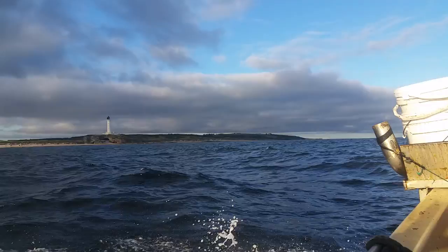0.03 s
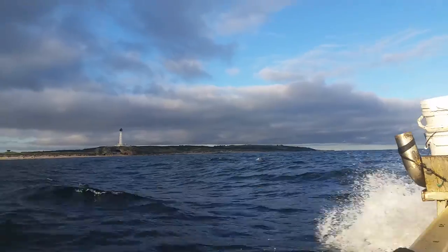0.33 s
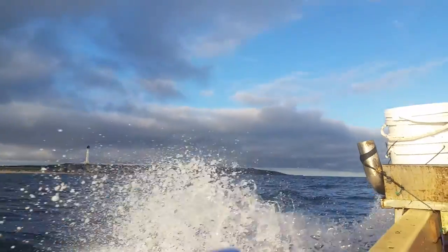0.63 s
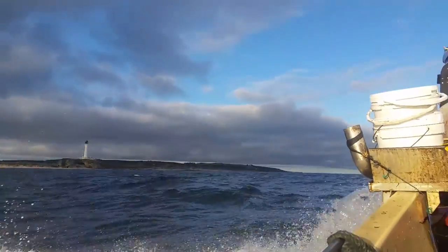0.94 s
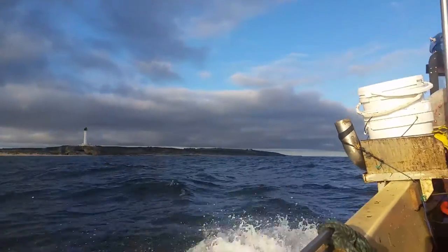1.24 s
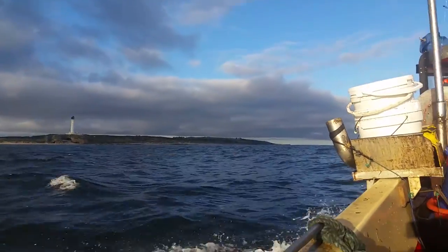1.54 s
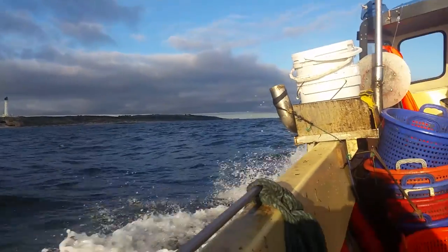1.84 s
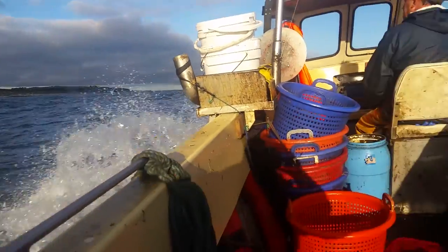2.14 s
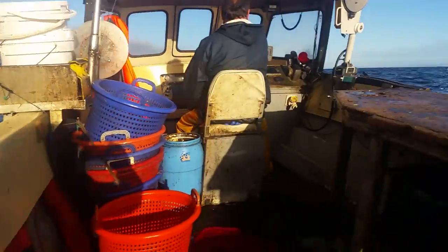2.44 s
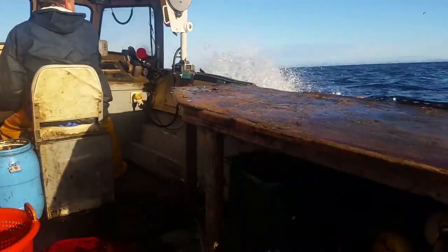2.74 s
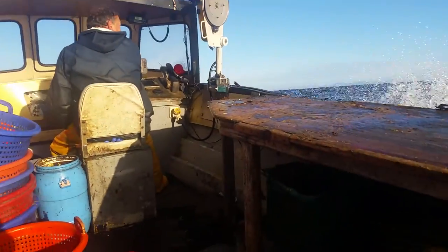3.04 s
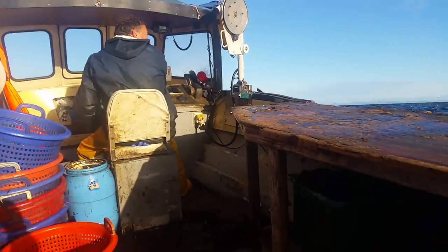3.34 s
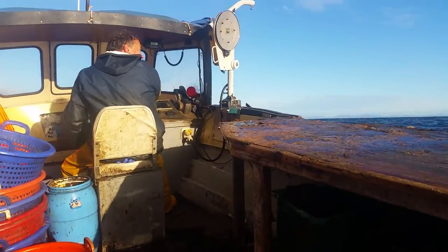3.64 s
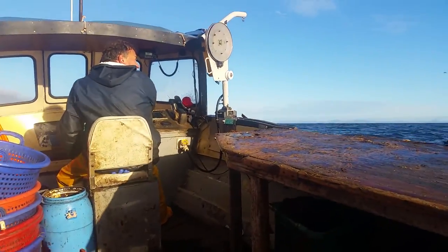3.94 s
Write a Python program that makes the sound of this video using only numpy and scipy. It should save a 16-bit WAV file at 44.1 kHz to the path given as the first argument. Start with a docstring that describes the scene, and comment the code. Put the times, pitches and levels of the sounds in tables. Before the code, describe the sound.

The diesel engine of a small boat fades in and holds a steady drone at sea. Spray splashes over the hull wash, wind buffets the microphone on deck with some hollow knocks, and the engine's clatter grows clearer past halfway.

```python
"""Open deck of a small fishing boat at steady speed. Fade-in on a four-cylinder diesel, its exhaust
droning at the firing rate. From 0.5 s bow spray hisses up and patters back over the hull wash.
From 1.3 s wind thumps repeatedly on the microphone ports, mostly the left, with a few hollow knocks.
Around 2.4 s a turn to the wheelhouse brings out the clatter of the block and a brief thin ring.
Spray and buffets continue to the end."""
import sys
import numpy as np
from scipy.fft import rfft, irfft, next_fast_len
from scipy.io import wavfile
from scipy.ndimage import uniform_filter1d, minimum_filter1d, map_coordinates

SR = 44100
rng = np.random.default_rng(int(sys.argv[2]) if len(sys.argv) > 2 else 0)


def master_out(mix):
    """Clip the mix to full scale and print it as 16-bit PCM to the path in sys.argv[1]."""
    frames = np.transpose(np.atleast_2d(mix))
    ceiling = np.clip(frames, -1, 1)
    pcm = np.round(ceiling * 32767).astype(np.int16)
    wavfile.write(sys.argv[1], SR, pcm)


N = 176400

# engine speed (time [s], firing rate [Hz])
FIRING_RATE = [(0.7, 147.0), (1.05, 146.7), (1.4, 147.2), (1.8, 147.1), (2.2, 147.1), (2.6, 147.7),
               (3.0, 147.2), (3.4, 147.6), (3.7, 147.7)]
# firing note as the deck rolls (time [s], left gain [dB], right gain [dB])
EXHAUST_ROLL = [(.4, 0.5, -1), (.7, -1.5, -3), (1.25, -1, -2.5), (1.48, -1.5, -5.5), (1.62, -0.5, -2),
                (1.9, -1.5, -3.5), (2.15, -3.5, -5.5), (2.35, -2, -2.5), (2.7, -1.5, 0.5), (2.95, -1, 0.5),
                (3.15, 0.5, 2), (3.5, 0, 0), (3.75, -1, 0.5), (4, 0, 1)]
# octave of the firing note (time [s], gain [dB])
OCTAVE_GAIN = [(.4, 9.5), (1.2, 8.5), (2.35, 8), (2.7, 0), (3.3, -2.5), (4, -11)]
# engine lines (order [x cycle rate], left [dB], right [dB], gain before the turn [dB])
ENGINE_LINES = [(5, -39, -44, 0), (6, -33, -34, -9), (7, -28, -31, -4), (9, -41, -40, -1),
                (10, -41, -44, -2), (12, -35, -40, 1), (13, -47, -47, -7), (16, -35, -37, -3),
                (18, -48, -51, -1), (19, -44, -49, -1), (20, -47, -43, -1), (23, -44, -43, -5),
                (24, -45, -49, -3), (25, -53, -44, -13), (28, -45, -52, -2), (42, -50, -51, -13),
                (43, -52, -51, -7), (48, -54, -46, -7), (56, -57, -47, -7)]
# level of the engine drone lines by frequency (frequency [Hz], gain [dB])
DRONE_COLOUR = [(200, 2), (330, 1.5), (450, -1), (700, -2.5), (900, -1), (1250, 2), (1550, 2.5), (2100, 2)]
# line two octaves over the firing note (time [s], gain [dB])
WHINE_GAIN = [(.4, 2.5), (1.65, 4), (2.2, -7), (2.7, 2.5), (2.95, 3.5), (3.55, 3.5), (4, -3)]
# block rasp (frequency [Hz], level per line [dB])
RASP_SPECTRUM = [(950, -56.5), (1250, -54), (1450, -60), (1900, -54.5), (2300, -61), (2700, -63),
                 (3000, -74)]
# block clatter (frequency [Hz], left [dB], right [dB])
CLATTER_SPECTRUM = [(200, -15, -7), (600, 3.5, -4.5), (1150, -6, 3), (1360, 12, 9), (1377, -11, -30),
                    (1840, -13, 3), (2450, -15, -7), (3100, -7.5, -7), (4020, -15, -6.5), (7000, -23, -23),
                    (16100, -27, -47)]
# clatter share, one per cylinder (gain [dB])
CYLINDER_DB = [3, 1, 1.8, 3.2]
# bow spray (time [s], left [dB], right [dB])
SPRAY_LEVEL = [(.42, -42, -42), (.515, -43, -45), (.53, -34, -40), (.57, -38.5, -38.5), (.7, -42, -37.5),
               (.8, -41, -37), (.86, -37, -35), (.93, -37, -34.5), (.975, -35, -30.5), (1.03, -36, -35),
               (1.19, -33.5, -33), (1.29, -38, -37.5), (1.35, -40, -37), (1.42, -48, -47.5),
               (1.8, -45.5, -43.5), (2.13, -48, -45.5), (2.4, -38, -36.5), (2.52, -33.5, -36.5),
               (2.7, -40, -38.5), (2.9, -41.5, -38), (3.38, -31.5, -34), (3.445, -37, -36.5),
               (3.475, -41, -40), (4, -39, -38)]
# bow spray (frequency [Hz], left [dB], right [dB])
SPRAY_SPECTRUM = [(796, -3, -10), (2000, 0, 0.5), (2900, -8, -7), (3630, -0.5, -9), (5070, -10.5, 1),
                  (6120, -14, -1), (7450, -9, -8.5), (8640, -1, -8.5), (9720, 5.5, 3), (10700, 4.5, 6),
                  (11800, -3, 4), (14300, 3.5, -1.5), (17100, -3, -0.5)]
# hull wash (time [s], level [dB])
WASH_LEVEL = [(.4, -23.5), (.512, -28), (.53, -21), (.58, -28), (.75, -29.5), (.95, -29), (1.23, -26.5),
              (1.45, -32.5), (1.8, -31), (2.12, -32.5), (2.4, -28.5), (3.3, -29.5), (4, -32)]
# hull wash (frequency [Hz], left [dB], right [dB])
WASH_SPECTRUM = [(20, -1, -15), (60, 10.5, 9), (208, 7.5, -1), (495, 6, 3.5), (826, -5, -4),
                 (1450, -11, -7), (1830, -11.5, -9.5), (2690, -14, -18.5), (2900, -18, -27),
                 (5570, -34.5, -22.5), (16000, -52, -64)]
# drops from the big splash (time [s], level [dB])
SPATTER_LEVEL = [(.5, -51), (.69, -37), (.79, -39.5), (.88, -39.5), (.94, -42), (.98, -36), (1.04, -42.5),
                 (1.37, -45), (1.44, -63)]
# drops (frequency [Hz], level [dB])
SPATTER_SPECTRUM = [(3700, -31), (5600, -6), (7600, -11), (9000, -9), (10300, 6), (11500, 5), (13000, -11)]
# wind hits (time [s], half length [s], level [dB], flutter gain [dB], left over right [dB])
WIND_BUFFETS = [(0.496, 0.015, -13.5, 5, -1), (1.306, 0.027, -8, 5, 25), (1.341, 0.017, -3, -5, 11),
                (1.404, 0.013, -7.5, -6, -5), (1.433, 0.036, -12, -5, 22), (1.505, 0.035, -16, -1, -3),
                (1.728, 0.064, -22.5, -3, -3), (1.842, 0.005, -14, 4, 29), (1.892, 0.013, -20, 10.5, 4),
                (1.97, 0.012, -12.5, -8, 18), (2.115, 0.017, -11, -20, 15), (2.164, 0.0079, -10, 3.5, 20),
                (2.31, 0.025, -21, -8, 14), (2.688, 0.0095, -11.5, -10, 20),
                (2.888, 0.033, -11.5, -2.5, 10), (3.056, 0.012, -21, 7, 0.5), (3.144, 0.018, -13, -15, 16),
                (3.241, 0.028, -13.5, -21, 23), (3.32, 0.03, -14, -12, 21), (3.48, 0.009, -8, 6, 16),
                (3.63, 0.054, -16.5, -4, 24), (3.721, 0.026, -10, -15, 15), (3.784, 0.019, -14, -12, 18),
                (3.853, .018, -10.5, -5, 18)]
# breeze (time [s], gain [dB])
BREEZE_GAIN = [(.4, 0.5), (1.1, -17), (1.3, -3), (2.3, -1.5), (2.6, -2), (3.2, -8.5), (4, -3)]
# wind thump (frequency [Hz], level [dB])
THUMP_SPECTRUM = [(12, -11), (30, -11), (60, -3), (120, 1.5), (200, -7.5), (320, -15), (600, -31),
                  (1500, -54), (5000, -86)]
# wind flutter (frequency [Hz], level [dB])
FLUTTER_SPECTRUM = [(100, 3), (250, 7), (450, 2), (760, -6.5), (950, -8.5), (1400, -23), (3000, -34),
                    (8000, -71)]
# hollow knocks (time [s], level [dB], pitch [ratio], left over right [dB])
KNOCK_HITS = [(1.386, -16, .85, 8), (1.396, -8.5, 1.05, 0), (1.845, -8, 1, 22), (1.97, -17, 1.05, 15),
              (2.191, -14.5, 1.03, 20), (3.477, -8, .88, 22)]
# knock modes at pitch 1 (frequency [Hz], level [dB], T60 [s])
HOLLOW_MODES = [(350, -4, .035), (480, -6, .025), (620, -2, .028), (750, -3, .024), (1210, -21, .02)]

CYLINDERS = 4
CYCLE_HZ = FIRING_RATE[0][1] / CYLINDERS  # nominal
TIME_S = np.arange(N) / SR


def engine(jitter_cycles=.001):
    """One slightly unsteady crankshaft drives all engine layers."""
    cycles = np.cumsum(curves(FIRING_RATE)[0]) / SR / CYLINDERS + jitter_cycles * wobble(25)
    return exhaust(cycles) + drone(cycles) + rasp(cycles) + ring(cycles) + clatter(cycles)


def exhaust(cycles, note_db=(-10.5, -13), octave_db=(-32, -34.5), waver_db=.21):
    """Firing note and its octave; level pairs are (left, right)."""
    note = engine_line(cycles, CYLINDERS, note_db, curves(EXHAUST_ROLL), waver_db)
    return note + engine_line(cycles, 2 * CYLINDERS, octave_db, curves(OCTAVE_GAIN), waver_db)


def drone(cycles):
    """Weak wavering lines at multiples of the cycle rate."""
    aside, whine_db, out = facing_side(), curves(WHINE_GAIN)[0], 0
    for order, left_db, right_db, aside_db in ENGINE_LINES:
        colour_db = np.interp(order * CYCLE_HZ, *np.transpose(DRONE_COLOUR))
        gain_db = colour_db + aside * aside_db + whine_db * (order == 4 * CYLINDERS)
        out += engine_line(cycles, order, [left_db, right_db], gain_db, waver_db=1, phase=rng.random())
    return out


def engine_line(cycles, order, ports_db, gain_db, waver_db, phase=0, right_lead_s=.00017):
    """Sine locked to the engine cycle, wavering in level."""
    lag_cycles = np.array([[.5], [-.5]]) * right_lead_s * CYCLE_HZ
    waver = np.interp(np.arange(N), np.linspace(0, N, 48), rng.standard_normal(48))
    rms = amp(ports_db)[:, None] * amp(gain_db + waver_db * waver)
    return rms * np.sqrt(2) * np.sin(2 * np.pi * (order * (cycles - lag_cycles) + phase))


def clatter(cycles, level_db=-39, aside_db=-9.5, decay_firings=1.4):
    """Each firing shakes a noise burst out of the block, each cylinder at its own strength."""
    firings = cycles * CYLINDERS
    strength = amp(CYLINDER_DB)[np.floor(firings).astype(int) % CYLINDERS]
    bursts = uniform_filter1d(strength * np.exp(-(firings % 1) / decay_firings), size=40)
    return amp(level_db + aside_db * facing_side()) * unit(bursts) * noise(CLATTER_SPECTRUM)


def rasp(cycles, spread_db=2.5, aside_db=-4.5):
    """Block rattle repeating every cycle: a comb of weak lines, different at each port."""
    orders = np.setdiff1d(np.arange(26, 82), np.transpose(ENGINE_LINES)[0])
    line_db = np.interp(orders * CYCLE_HZ, *np.transpose(RASP_SPECTRUM))
    peaks = np.sqrt(2) * amp(line_db + spread_db * rng.standard_normal((2, len(orders))))
    one_cycle = np.linspace(0, 1, 2048)
    phases = orders[:, None] * one_cycle + rng.random((2, len(orders), 1))
    rattle = (peaks[..., None] * np.sin(2 * np.pi * phases)).sum(axis=1)
    repeated = np.array([np.interp(cycles % 1, one_cycle, port) for port in rattle])
    return amp(aside_db * facing_side()) * repeated


def ring(cycles, order=36, peak_s=2.58, half_s=.28, level_db=-45):
    """One engine line swells and fades during the turn."""
    swell = np.exp(-((TIME_S - peak_s) / half_s) ** 2)
    return amp(level_db) * swell * np.sqrt(2) * np.sin(2 * np.pi * order * cycles)


def facing_side(turn_s=2.4, half_s=.44):
    """1 facing over the side, 0 facing the wheelhouse."""
    return .5 - .5 * np.tanh((TIME_S - turn_s) / half_s)


def spray(gain_db=1, surge_db=.95, flicker_db=.7):
    """Sheets of bow spray hiss as they rise and fall back."""
    flicker = np.array([wobble(400), wobble(400)])
    level_db = gain_db + curves(SPRAY_LEVEL) + surge_db * wobble(24.72) + flicker_db * flicker
    return amp(level_db) * noise(SPRAY_SPECTRUM)


def wash(surge_db=1.03):
    """Water surges along the hull."""
    return amp(curves(WASH_LEVEL) + surge_db * wobble(16)) * noise(WASH_SPECTRUM)


def spatter(drops_per_s=2500, spread_db=4, clump_db=1.6, ports_db=(-8, 2)):
    """Uneven drops from the big splash land in clumps."""
    impacts = (rng.random((2, N)) < drops_per_s / SR) * rng.choice([-1, 1], (2, N))
    drops = impacts * amp(spread_db * rng.standard_normal((2, N)))
    level_db = curves(SPATTER_LEVEL) + np.array(ports_db)[:, None] + clump_db * wobble(69.6)
    return amp(level_db) * noise(SPATTER_SPECTRUM, drops)


def wind(ports_db=(-19.5, -30), swing_db=3.5, flutter_db=-10, breeze_flutter_db=-4.5):
    """Lumpy breeze and buffets on the ports: low thump plus brighter flutter."""
    swing = np.array([wobble(23.93), wobble(25)])
    breeze = amp(np.array(ports_db)[:, None] + curves(BREEZE_GAIN) + swing_db * swing)
    thump_power, flutter_power = breeze ** 2, (amp(breeze_flutter_db) * breeze) ** 2
    for peak_s, half_s, level_db, bright_db, pan_db in WIND_BUFFETS:
        width_s = half_s * np.where(TIME_S < peak_s, .97, 1)
        power = panned(level_db, pan_db) ** 2 * np.exp(-((TIME_S - peak_s) / width_s) ** 2)
        thump_power += power
        flutter_power += power * amp(bright_db) ** 2
    thump = np.sqrt(thump_power) * even(noise(THUMP_SPECTRUM), window_samples=1100)
    flutter = np.sqrt(flutter_power) * even(noise(FLUTTER_SPECTRUM), window_samples=600)
    return thump + amp(flutter_db) * flutter


def knocks(attack_s=.0015):
    """Hollow knocks: a few quickly damped modes."""
    out, t = np.zeros((2, N + SR)), np.arange(SR // 10) / SR
    attack = 1 - np.exp(-t / attack_s)
    for start_s, level_db, pitch, pan_db in KNOCK_HITS:
        modes = sum(amp(db - 60 * t / t60_s) * np.sin(2 * np.pi * (hz * pitch * t + rng.random() / 2))
                    for hz, db, t60_s in HOLLOW_MODES)
        start = round(start_s * SR)
        out[:, start:start + len(t)] += panned(level_db, pan_db) * modes * attack
    return out[:, :N]


def amp(db):
    """dB to gain."""
    return 10 ** (np.asarray(db) / 20)


def panned(level_db, pan_db):
    """Stereo gains; positive pan lowers the right, negative the left."""
    return amp(level_db + np.minimum([[pan_db], [-pan_db]], 0))


def unit(x):
    """Overall rms 1."""
    return x / np.sqrt(np.mean(x ** 2) + 1e-20)


def even(x, window_samples):
    """Short-term rms 1."""
    return x / np.sqrt(np.abs(uniform_filter1d(x ** 2, size=window_samples)) + 1e-9)


def curves(rows):
    """Per-sample curve for each column after time."""
    times_s, *columns = np.transpose(rows)
    return np.array([np.interp(TIME_S, times_s, column) for column in columns])


def wobble(knots_per_s):
    """Smooth random curve."""
    knots = rng.standard_normal(int(N * knots_per_s / SR) + 4)
    return map_coordinates(knots, [TIME_S * knots_per_s], mode="nearest")


def filtered(x, response):
    """Zero-phase filter with gain response(hz)."""
    size = next_fast_len(N + SR // 2)
    return irfft(rfft(x, size) * response(np.fft.rfftfreq(size, 1 / SR)), size)[..., :N]


def noise(spectrum, source=None):
    """Stereo white noise, or source, shaped to a spectrum; rms 1."""
    knots_hz, *columns_db = np.transpose(spectrum)
    gain = lambda hz: amp([np.interp(np.log(hz + 1), np.log(knots_hz), db) for db in columns_db])
    return unit(filtered(rng.standard_normal((2, N)) if source is None else source, gain))


def scene():
    """Engine, water, wind and knocks on deck."""
    return engine() + spray() + wash() + spatter() + wind() + knocks()


def record(dry, ceiling=.92, hold_s=.015, fade_start_s=.41, fade_s=.31, hiss_db=-108, top_hz=15800):
    """Limiter on the hardest buffets, linear fade-in, faint steady hiss from the start, low-pass."""
    hold = int(hold_s * SR)
    needed_gain = np.minimum(1, ceiling / (np.abs(dry).max(axis=0) + 1e-9))
    limited = dry * uniform_filter1d(minimum_filter1d(needed_gain, hold), hold)
    faded = limited * np.clip((TIME_S - fade_start_s) / fade_s, 0, 1)
    hiss = amp(hiss_db) * rng.standard_normal((2, N))
    return filtered(faded + hiss, lambda hz: 1 / (1 + (hz / top_hz) ** 400))


dry = scene()
out = record(dry)
master_out(out)
```